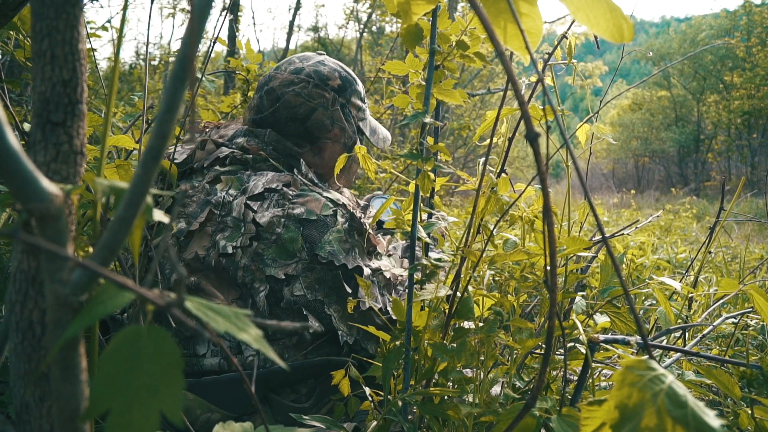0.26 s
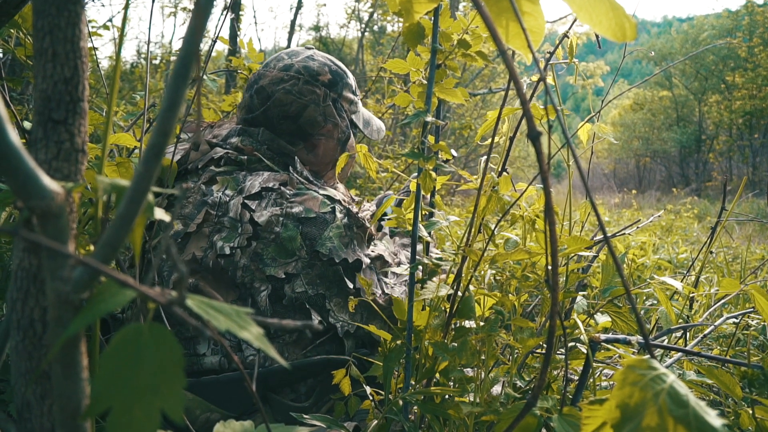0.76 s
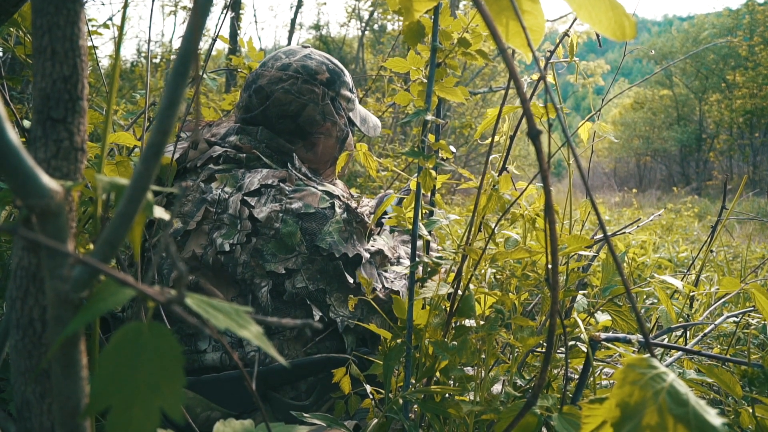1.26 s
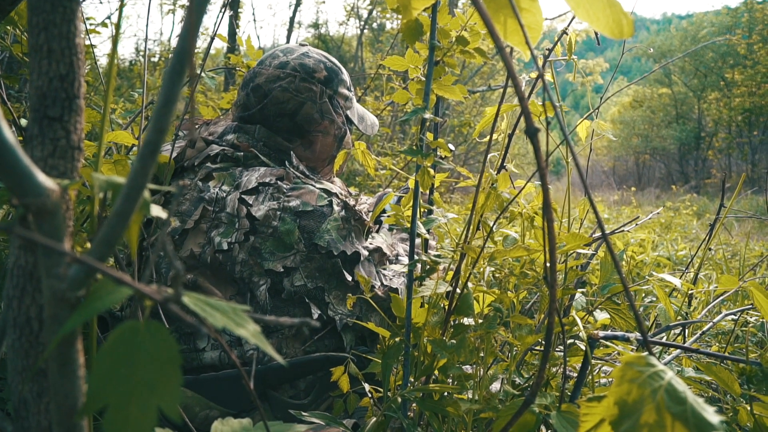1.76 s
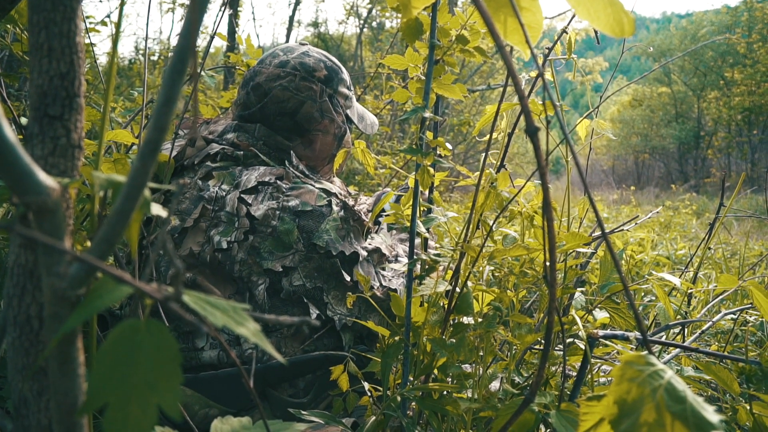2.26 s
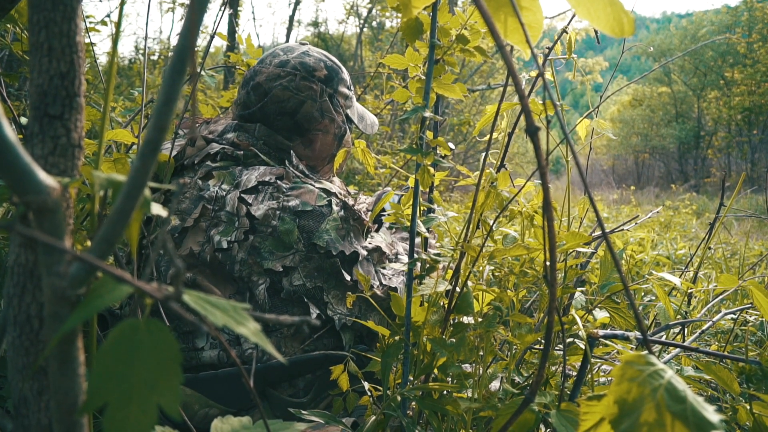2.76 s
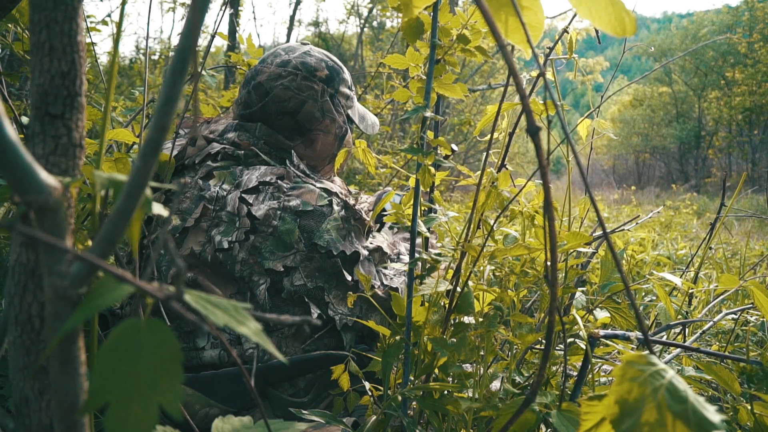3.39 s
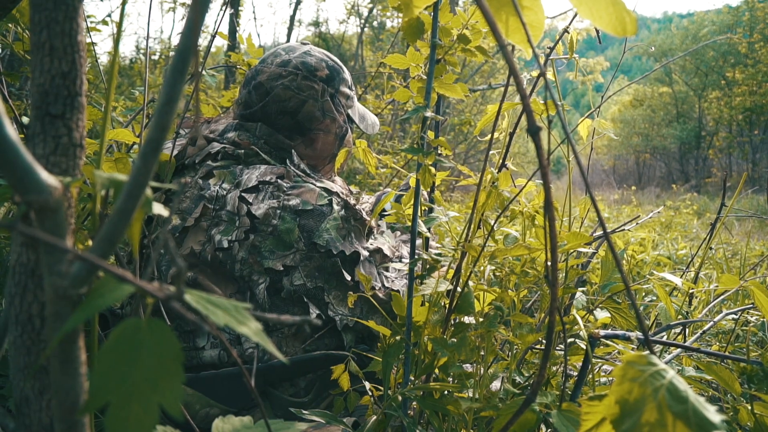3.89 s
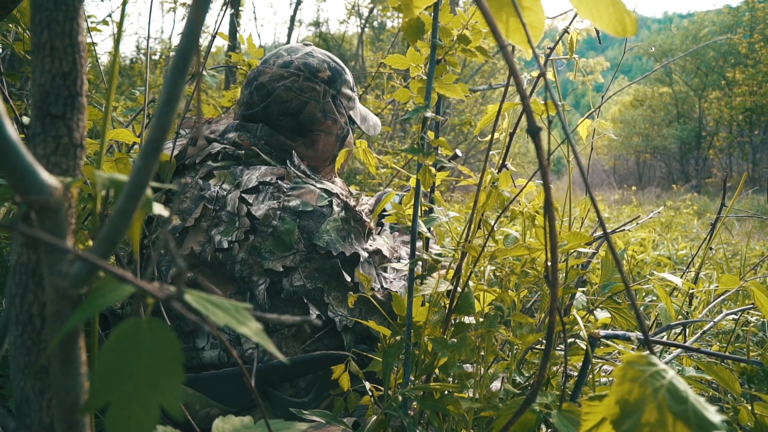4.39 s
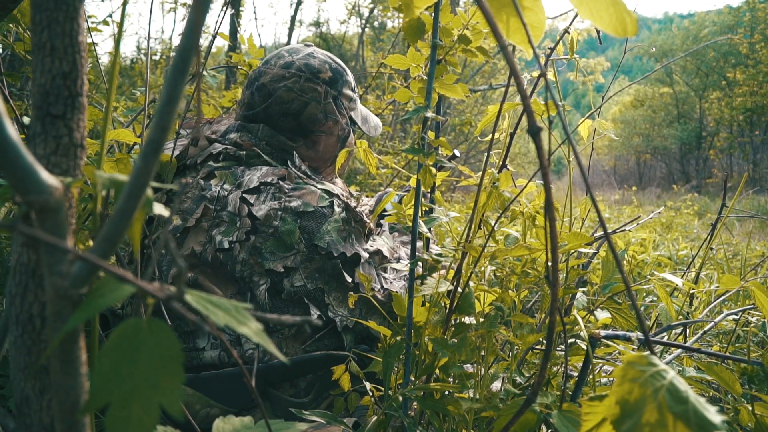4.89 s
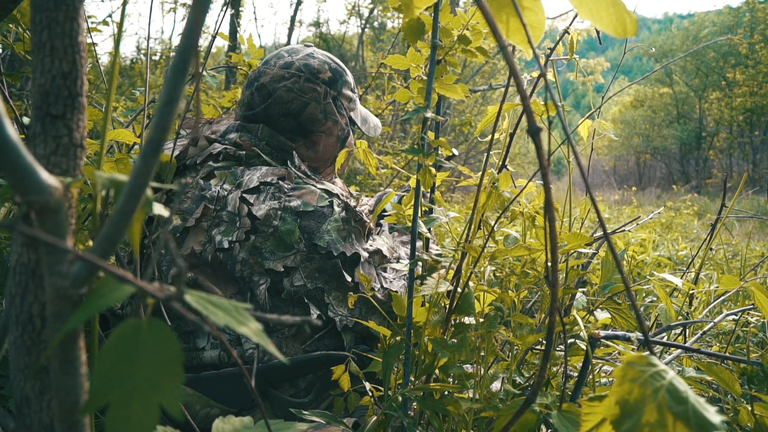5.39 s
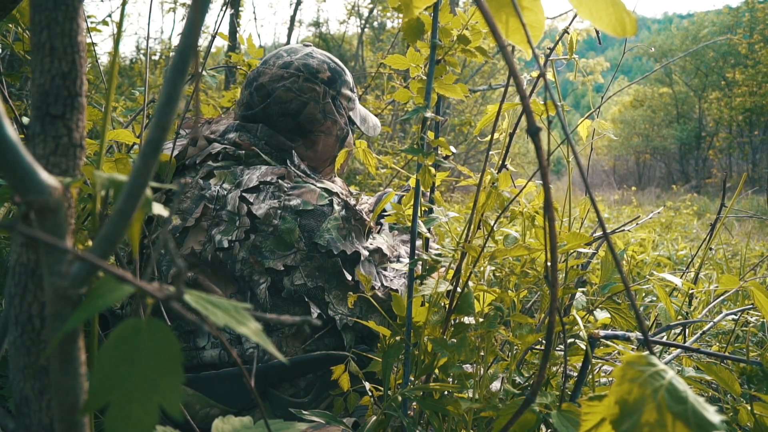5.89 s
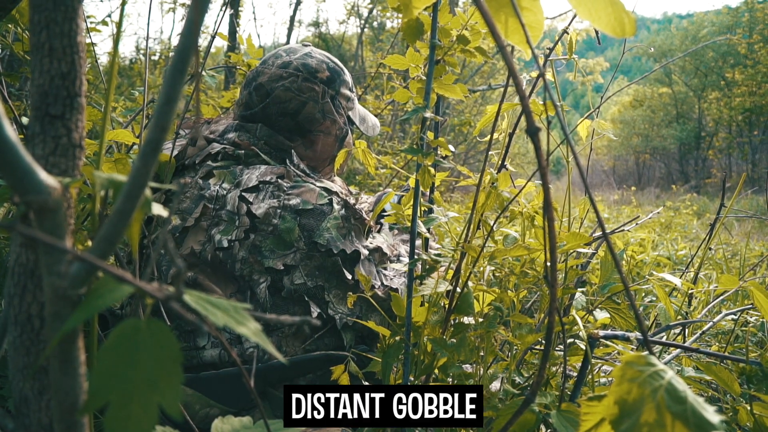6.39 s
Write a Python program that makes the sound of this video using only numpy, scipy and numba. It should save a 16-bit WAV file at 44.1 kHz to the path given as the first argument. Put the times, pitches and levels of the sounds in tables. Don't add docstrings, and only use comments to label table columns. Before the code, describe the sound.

Outdoors in spring woodland, low wind rumbles while small birds whistle and twigs knock dully near the microphone. A chalky wooden box call, very close, gives three short clucks, then seven loud yelps, each breaking from high squeal to lower, harsher squeal with a scrape after. A sparrow trills down the scene, and a far turkey gobbles hoarsely at the end.

```python
import sys
import numpy as np
from scipy import signal
from scipy.fft import rfft, irfft, next_fast_len
from scipy.io import wavfile
from scipy.ndimage import uniform_filter1d, map_coordinates
from numba import njit

SR = 44100
rng = np.random.default_rng(int(sys.argv[2]) if len(sys.argv) > 2 else 0)


def digitize_waveform(pressure):
    field = np.atleast_2d(pressure).T
    bounded = np.clip(field, -1, 1)
    quanta = np.round(bounded * 32767).astype(np.int16)
    wavfile.write(sys.argv[1], SR, quanta)


def volts_from_db(level):
    exponent = np.asarray(level, float) / 20
    return 10 ** exponent


N = 293265
TIME = np.arange(N) / SR
TOP_HZ = 15700


def unit(x):
    return x / np.sqrt(np.mean(x ** 2) + 1e-20)


def along(points, hz):
    f, v = np.transpose(points)
    return np.interp(np.log(hz + 1), np.log(f + 1), v)


def wobble(rate):
    return map_coordinates(rng.standard_normal(int(N * rate / SR) + 4), [TIME * rate])


def filtered(x, response):
    m = next_fast_len(N + SR // 2)
    return irfft(rfft(x, m) * response(np.fft.rfftfreq(m, 1 / SR)), m)[:N]


def noise(spectrum):
    return unit(filtered(rng.standard_normal(N), lambda hz: volts_from_db(along(spectrum, hz))))


def step(t, width):
    return .5 + .5 * np.tanh(t / width)


def bump(s, width):
    return np.exp(-((TIME - s) / width) ** 2)


def ring(t, hz, t60, rise):
    t = np.maximum(t, 0)
    return np.sin(2 * np.pi * hz * t) * volts_from_db(-60 * t / t60) * (1 - np.exp(-t / rise))


# [f/Hz, t60/s]
TRUNK_DECAY = [(300, .6), (1500, 1.8), (2500, 1.0), (3500, .45), (10000, .2)]


def woods(x):
    hz, t, z = signal.stft(rng.standard_normal(SR), SR, nperseg=256)
    decay = volts_from_db(-60 * t / along(TRUNK_DECAY, hz)[:, None])
    tail = signal.istft(z * decay, SR, nperseg=256)[1]
    delayed = np.pad(x, (600, 0))
    return signal.fftconvolve(delayed, tail / np.linalg.norm(tail))[:N]


def thicket(x, t60):
    tail = rng.standard_normal(SR // 4) * volts_from_db(-60 * np.arange(SR // 4) / SR / t60)
    return signal.fftconvolve(x, tail / np.linalg.norm(tail))[:N]


# [f/Hz, level/dB]
WIND_SPECTRUM = [(12, -29.5), (20, 5.5), (43, -5), (77, 1), (166, -8), (202, -19), (274, -17), (300, -21),
                 (390, -52), (660, -120)]
# [t/s, half width/s, level/dB]
WIND_GUSTS = [
    (.68, 0.22, 10.5),
    (1.62, 0.23, 6),
    (2.468, 0.079, 7.5),
    (2.8, 0.25, 2),
    (3.18, 0.034, 17.5),
    (3.35, 0.58, -2.5),
    (3.5, 0.031, 6),
    (4.15, 0.095, 2),
    (6.6, 0.27, -0.5),
]


def wind():
    lumps = unit(volts_from_db(1.94 * wobble(10.0)) * noise(WIND_SPECTRUM))
    gust_db = sum(db * bump(s, width) for s, width, db in WIND_GUSTS)
    return volts_from_db(-40.5 + gust_db) * lumps


# [f/Hz, level/dB]
AIR_SPECTRUM = [(120, -32), (200, 3.5), (249, -29), (321, -3.5), (535, -5), (607, -2.5), (975, -7.5),
                (2380, -14.5), (3190, -13.5), (5210, -23.5), (13400, -27), (15500, -26)]


def woodland_air():
    return volts_from_db(-49 + 0.73 * wobble(3.64)) * noise(AIR_SPECTRUM)


# [f/Hz, level/dB]
CHORUS_SPECTRUM = [(2200, -4.5), (2800, -8), (3700, 0), (4200, -3.5), (4600, -5.5), (5500, -14.5),
                   (6200, -23.5)]


def far_chorus():
    fade_db = -33.5 * (1 - bump(0, 0.79))
    return volts_from_db(-43.5 + fade_db + 1.5 * wobble(34.0)) * noise(CHORUS_SPECTRUM)


# [t/s, level/dB, beak opening/dB per octave]
GOBBLE_SYLLABLES = [(6.165, -46, 3), (6.237, -42, 0.5), (6.29, -49.5, 0), (6.33, -57, -2), (6.365, -50, -8),
                    (6.4, -40.5, 10), (6.46, -43.5, 2), (6.485, -44.5, -6), (6.54, -53, -6),
                    (6.58, -47, -9), (6.63, -48.5, -8)]
# [f/Hz, width/Hz, level/dB]
THROAT_BANDS = [(1280, 200, -1), (683, 220, -7.5), (966, 160, -5.5), (1565, 270, -7.5)]


def gobble():
    phase = 2 * np.pi * np.cumsum(312 * (1 + .06 * wobble(30))) / SR
    pulses = np.exp(6 * np.cos(phase)) * (1 + 2.1 * rng.standard_normal(N))
    out = 0
    for centre, width, band_db in THROAT_BANDS:
        def resonance(f):
            damping = 1j * f * width
            return (damping / (centre * centre - f * f + damping)) ** 2

        band = unit(filtered(pulses, resonance))
        octaves = np.log2(centre / THROAT_BANDS[0][0])
        effort = 0
        for s, level_db, beak_db in GOBBLE_SYLLABLES:
            syllable = bump(s, 0.015) + volts_from_db(-9) * bump(s, 0.042)
            effort = effort + volts_from_db(level_db + beak_db * octaves) * syllable
        out = out + band * effort * volts_from_db(band_db + 3.9 * wobble(40))
    return out * volts_from_db(0.97 * wobble(80))


def note(out, start, end, hz, db, edge):
    length = end - start
    t = np.arange(round(length * SR)) / SR
    pitch = np.polyval(np.polyfit([0, .5, 1], hz, deg=2), t / length)
    swell = step(t - edge, edge) * step(length - edge - t, edge)
    tone = volts_from_db(db + 2) * swell * np.sin(2 * np.pi * np.cumsum(pitch) / SR)
    return out + np.pad(tone, (round(start * SR), N))[:N]


# [start t/s, end t/s, f/Hz, level/dB]
SPARROW_WHISTLES = [(.005, 0.042, 4750, -54.5), (0.108, .165, 4600, -53), (0.196, 0.254, 4530, -55.5),
                    (3.22, 3.287, 4120, -53), (3.845, 3.903, 3920, -55), (4.137, 4.207, 3900, -48.5),
                    (4.39, 4.44, 3950, -48.5), (4.47, 4.505, 3870, -55), (4.515, 4.57, 3890, -46),
                    (4.587, 4.61, 3870, -53), (4.624, 4.652, 3890, -47), (4.668, 4.69, 3870, -51),
                    (4.722, 4.753, 3880, -46), (4.765, 4.79, 3860, -52), (4.803, 4.84, 3870, -48),
                    (4.858, 4.874, 3880, -48.5), (5.906, 6.074, 4040, -64), (6.21, 6.301, 4030, -62),
                    (6.458, 6.642, 3970, -65)]


def sparrow_whistles():
    out = np.zeros(N)
    for start, end, hz, db in SPARROW_WHISTLES:
        out = note(out, start, end, [hz, hz, hz], db, edge=.002)
    return out


def sparrow_trill():
    out = np.zeros(N)
    for k in range(16):
        start = 4.887 + .0706 * k
        db = -41.5 - 0.28 * k + rng.normal(0, 1.0)
        top_hz = 4320 - 540 * np.exp(-(k / 1.37) ** 2)
        end_hz = 3473 + 304 * np.exp(-k / 0.75)
        sweep = [top_hz + 150, end_hz + .4 * (top_hz - end_hz), end_hz + 40]
        out = note(out, start, start + .027, sweep, db - 4, edge=.003)
        hook = end_hz + np.array([200, -20, 80]) + rng.normal(0, 40)
        out = note(out, start + .02, start + .043, hook, db - 6 + rng.normal(0, 2), edge=.003)
    return out


# [t/s, length/s, first f/Hz, last f/Hz, level/dB]
WARBLER_GLIDES = [(0.039, 0.02, 3940, 2460, -39), (0.075, 0.016, 2700, 3950, -38),
                  (0.205, .028, 3010, 2960, -46), (0.237, 0.025, 2925, 3700, -42),
                  (0.265, 0.023, 3700, 2480, -38.5), (0.305, .039, 3150, 2520, -46),
                  (1.742, .043, 3250, 2694, -46), (1.848, 0.035, 2650, 2530, -40),
                  (1.781, 0.045, 2710, 3830, -40.5), (1.821, .024, 3330, 2690, -41.5),
                  (1.998, .022, 4740, 5070, -55), (2.018, .02, 4740, 3950, -48),
                  (2.035, .045, 4000, 3590, -42), (2.077, 0.019, 3580, 2640, -37),
                  (3.468, 0.031, 3050, 2590, -41), (3.506, .037, 2560, 4040, -42),
                  (3.54, 0.024, 3780, 2470, -37.5), (5.034, .087, 2200, 4100, -47),
                  (5.119, 0.017, 3970, 2500, -39), (5.197, 0.054, 4200, 2230, -40.5),
                  (5.267, .036, 2730, 2030, -48.5), (5.634, 0.055, 3580, 2290, -53.5),
                  (5.752, 0.028, 2630, 3330, -52), (5.795, 0.024, 2340, 3330, -53.5)]


def warbler():
    out = np.zeros(N)
    for start, length, first_hz, last_hz, db in WARBLER_GLIDES:
        middle = max(.56 - 4.5 * length, .26)
        mid_hz = min(first_hz, last_hz) + abs(first_hz - last_hz) * middle
        out = note(out, start, start + length, [first_hz, mid_hz, last_hz], db, edge=0.0026)
    return out


def birds():
    near, far, trill = warbler(), sparrow_whistles(), sparrow_trill()
    near = near * volts_from_db(2.2 * wobble(200))
    blur = volts_from_db(-1) * thicket(near, t60=.2) + volts_from_db(-5) * thicket(far, t60=.25)
    blur = blur + thicket(trill, t60=.09) + volts_from_db(-1) * thicket(trill, t60=.25)
    return near + far * volts_from_db(3.8 * wobble(140)) + 0.13 * trill + blur


# [t/s, peak level/dB]
LEAF_SNAPS = [
    (0.1769, -14.5),
    (0.1847, -18),
    (0.1916, -21),
    (0.198, -23.5),
    (0.9955, -24.5),
    (1.0824, -33.5),
]
# [f/Hz, level/dB]
LEAF_SPECTRUM = [(180, 0), (300, -6), (863, -16.5), (1970, -10), (2560, -22.5), (2980, -13.5),
                 (5950, -24.5), (8280, -21), (9760, -28.5), (15500, -29.5)]


def leaf_snaps():
    bursts = 0
    for s, db in LEAF_SNAPS:
        decay_db = -60 * np.abs(TIME - s) / 0.024
        bursts = bursts + volts_from_db(db - 6 + decay_db) * (TIME >= s)
    return bursts * noise(LEAF_SPECTRUM)


# [t/s, peak level/dB, boom level/dB]
TWIG_KNOCKS = [(.096, -24, -9.5), (0.432, -19.5, -9.5), (.555, -29.5, -1), (.609, -20.5, -14),
               (.706, -24.5, -16), (.754, -25, -7), (.952, -22, -9), (1.075, -26.5, -3.5),
               (1.153, -20, -6.5), (1.349, -25.5, -4), (1.59, -68, 18), (1.707, -22, -10.5),
               (2.075, -20.5, -8.5), (2.219, -27.5, -4), (2.761, -29, -5.5), (3.145, -18.5, -7.5),
               (3.227, -34, -4), (3.4, -23.5, -8.5), (3.439, -28, -4.5), (3.801, -27, -4.5),
               (4.471, -24, -5), (4.521, -29.5, -2.5), (5.229, -19, -7), (5.838, -25.5, -4),
               (5.873, -30, -15), (5.994, -29, -4.5), (6.398, -24, -6.5), (6.492, -30.5, -1.5),
               (6.594, -34.5, 1.5), (6.639, -35, -3)]


def twig_knocks():
    out, t = np.zeros(N + SR), np.arange(SR // 8) / SR
    luck = rng.standard_normal((len(TWIG_KNOCKS), 4))
    for (s, db, boom_db), r in zip(TWIG_KNOCKS, luck):
        tick_db = -11.5 + 0.5 * (db + 24)
        body = ring(t - .001, 350 * (1 + 0.015 * r[0]), 0.027, 0.0015)
        tick = ring(t, 1032, 0.0084, 0.00055)
        tick = tick + ring(t - .002, 700 * (1 + 0.028 * r[1]), 0.024, 0.0026)
        boom = ring(t - .011, 105 * (1 + 0.25 * r[2]), 0.053, 0.0057)
        boom = boom + 0.44 * ring(t - .014, 66 * (1 + 0.11 * r[3]), 0.14, 0.013)
        knock = body + volts_from_db(tick_db + 3.5) * tick + volts_from_db(boom_db + 12.0) * boom
        out[round(s * SR):][:len(t)] += volts_from_db(db + 6.5) * knock
    return out[:N]


# [start t/s, end t/s, level/dB]
STRAY_SCRAPES = [
    (1.419, 1.474, -46.5),
    (1.61, 1.68, -52),
    (1.93, 1.978, -37.5),
    (2.098, 2.165, -40),
    (3.884, 3.93, -30),
]
# [f/Hz, level/dB]
CHALK_SPECTRUM = [(410, -47), (700, -38), (1110, -14), (1180, -20.5), (1400, 0), (1740, 2.5), (2190, -6.5),
                  (2310, -22.5), (3100, -9.5), (4790, -26.5), (6430, -32), (11500, -46), (12700, -33),
                  (15000, -51)]


def lid_scrapes():
    back = [(end + 0.0027, end + 0.12, -34 + 0.42 * db) for _, _, end, _, db in STROKES[3:]]
    drag = 0
    for start, end, db in STRAY_SCRAPES + back:
        drag = drag + volts_from_db(db) * step(TIME - start, 0.002) * step(end - TIME, 0.035)
    return drag * unit(volts_from_db(1.6 * wobble(83)) * noise(CHALK_SPECTRUM))


# [start t/s, break t/s, end t/s, low pitch f/Hz, pressure level/dB]
STROKES = [
    (1.884, 1.8935, 1.9085, 722, -3),
    (1.925, 1.935, 1.949, 738, -3),
    (1.986, 2.03, 1.999, 800, -15),
    (2.269, 2.2795, 2.371, 740, -4),
    (2.624, 2.634, 2.716, 718, -3),
    (2.939, 2.973, 3.052, 712, 5),
    (3.259, 3.304, 3.368, 722, 5),
    (3.571, 3.607, 3.676, 712, 7),
    (3.906, 3.93, 3.994, 718, 6),
    (4.21, 4.253, 4.329, 695, 7),
]
# [f/Hz, level/dB]
BOX_WALLS = [(600, -68), (730, -33), (870, -26), (1080, -6.5), (1420, -2), (1900, 1), (2140, -1.5),
             (2270, -15), (2430, -50.5), (2700, -25.5), (3000, -13.5), (3600, -10.5), (4500, -23),
             (6500, -26), (9000, -38), (15000, -41.5)]
# [f/Hz, level/dB]
CALL_TONE = [(450, -24), (820, 0), (2280, 0), (2480, -12), (2750, 0), (10500, 0), (15500, -9)]
SNAG_S = 3.589


def slip_pitch(t, stroke, low, climb, lift, snag):
    start, brk, end, low_hz, db = stroke
    high_hz = 1002 + 8 * max(db, -5)
    jump = 1 + .21 * snag * np.exp(-np.abs(t - SNAG_S) / .011)
    high = high_hz * jump * (1 - 0.13 * (1 - climb) ** 3.2)
    quick = 0.28 * np.exp(-(brk - start) / 0.014)
    bounce = quick * np.exp(-((t - brk - .017) / 0.0058) ** 2)
    settle = .055 * min((brk - start) / .03, 1) * np.exp(-np.abs(t - brk) / .025)
    ease = .075 * np.exp(np.minimum(t - end, 0) / .016)
    return high * (1 - low) + low_hz * (1 + bounce + lift + settle + ease - .017) * low


def box_call():
    out, flutter, rasp, shake = np.zeros(N), wobble(120), wobble(700), wobble(1500)
    patchy = wobble(45)
    for stroke in STROKES:
        start, brk, end, low_hz, db = stroke
        part = slice(round((start - .01) * SR), round((end + .01) * SR))
        t, cluck = TIME[part], end - start < .03
        low = step(t - brk, 0.003)
        climb = np.clip((t - start) / (brk - start), 0, 1)
        lift = 0.33 * np.exp(np.minimum(t - end, 0) / 0.00378)
        snag = step(t - SNAG_S, .0015) * step(SNAG_S + .013 - t, .0015)
        pitch = slip_pitch(t, stroke, low, climb, lift, snag)

        uneven = np.clip((min(brk, end) - start) / .045, .4, 1)
        hoarse = .08 + (1 - low) * uneven * (1 - .7 * climb ** 3)
        phase = 2 * np.pi * np.cumsum(pitch * (1 + .006 * flutter[part])) / SR
        phase = phase + .13 * hoarse * shake[part]

        jolt_db = (6 + .4 * max(db, 0)) * np.exp(-((t - brk + .002) / .003) ** 2)
        rising_db = min(db, -5) - 11 * (1 - climb) ** 3
        level_db = jolt_db + rising_db * (1 - low) + db * step(t - brk - .003, 0.011)
        grip = volts_from_db(level_db) * step(t - start, .002) * step(end - t, .0015)
        grip = grip * (1 + .24 * hoarse * rasp[part])

        fresh_s = 0.031 + 0.039 * max(5.5 - db, 0)
        fresh_db = 12 * np.exp(-(np.maximum(t - brk, 0) / fresh_s) ** 2)
        dull_db = 3.6 * np.clip((t - brk) / (end - brk), 0, 1) ** 2
        dull_db = dull_db + 0.031 * (4.0 - db) + 1.3 * cluck

        for k in range(1, 21):
            hz = k * pitch
            slip_db = -9 * (k > 2) - dull_db * max(k - 3, 0) ** 0.74
            if k == 1:
                slip_db = slip_db + (27.0 + 2 * db) * lift * low - 14 * (1 - low) * (1 - climb)
            if k > 3:
                own_swell = patchy[part.start - 2000 * k:][:len(t)]
                slip_db = slip_db - 5 * (1 - low) * (1 - climb ** 4) + 2.5 * own_swell
            slip_db = slip_db - cluck * (6 * (k == 1) + 9 * step(hz - 3350, 120))
            wall_db = along(BOX_WALLS, hz) + fresh_db * np.exp(-((hz - 3050) / 220) ** 2)
            squeal = volts_from_db(wall_db + slip_db) * (1 - 1.1 * snag) * np.sin(k * phase + 0.67 * k * k)
            hard_slip = snag * volts_from_db(-1 - 4 * k) * np.cos(k * phase)
            out[part] += grip * (squeal + hard_slip) * (hz < TOP_HZ)

        tear = uniform_filter1d(np.diff(rng.standard_normal(len(t) + 1)), size=4)
        crack = tear * np.exp(-((t - brk + 0.0054) / 0.0035) ** 2)
        out[part] += volts_from_db(-23.5 + db - 5 * cluck) * crack
        under = np.sin(2 * np.pi * 2 * low_hz * t + 0.5 * rasp[part])
        out[part] += grip * volts_from_db(-13.5) * (1 - low) * hoarse * under
    return filtered(out, lambda hz: volts_from_db(along(CALL_TONE, hz)))


def scene():
    call, song, turkey = box_call(), birds(), gobble()
    echo = woods(volts_from_db(-45) * call + volts_from_db(-14) * song)
    echo = echo + volts_from_db(-19.5) * thicket(np.diff(call, prepend=0), t60=.5)
    far = turkey + volts_from_db(-8) * woods(turkey)
    background = wind() + woodland_air() + far_chorus()
    close = call + lid_scrapes() + twig_knocks() + leaf_snaps()
    return (background + volts_from_db(-2) * far + song + echo + close)[None]


@njit
def follow(level, attack, release):
    out, e = np.empty_like(level), 0.
    for i in range(len(level)):
        e += (level[i] - e) * (attack if level[i] > e else release)
        out[i] = e
    return out


def top_cut(x):
    return signal.sosfilt(signal.butter(12, 15690, fs=SR, output="sos"), x)


def record(dry):
    loud = follow(np.abs(dry[0]), 1 / (.004 * SR), 1 / (.009 * SR))
    x = dry / np.maximum(1, loud / volts_from_db(-10))
    x = x / (1 + np.abs(x / 1.02) ** 12) ** (1 / 12)
    x = filtered(x[0], lambda hz: hz < TOP_HZ)[None]
    return top_cut(x)


dry = scene()
out = record(dry)
digitize_waveform(out)
```